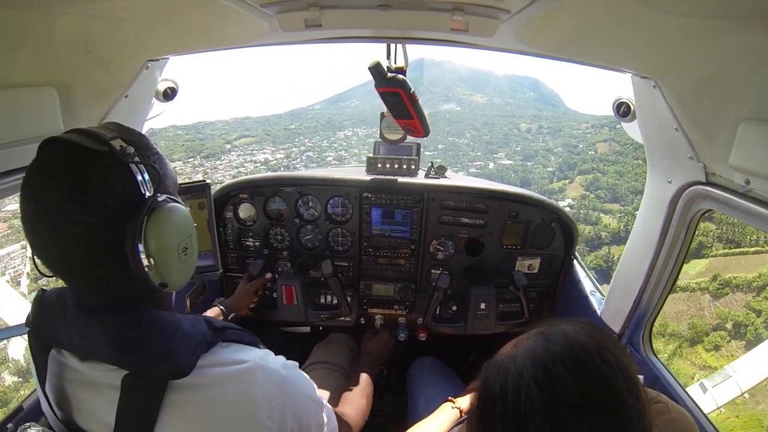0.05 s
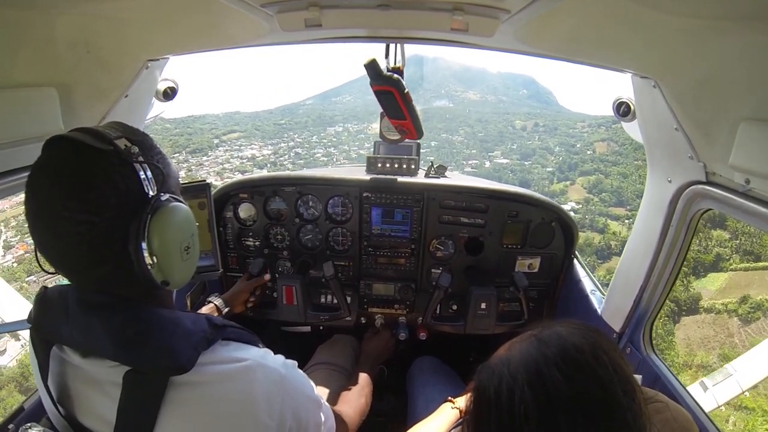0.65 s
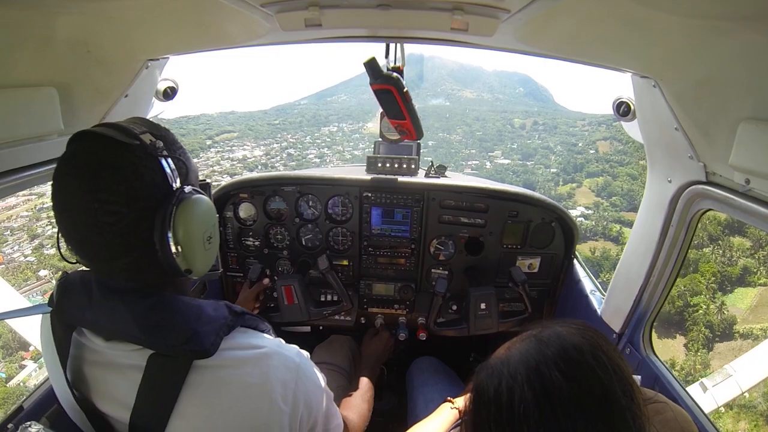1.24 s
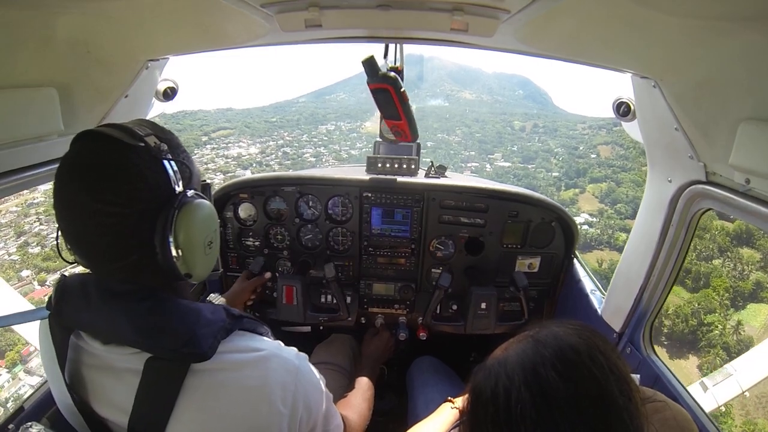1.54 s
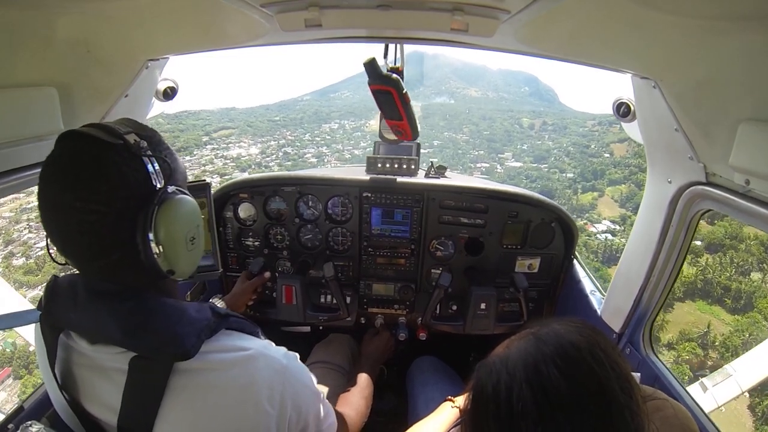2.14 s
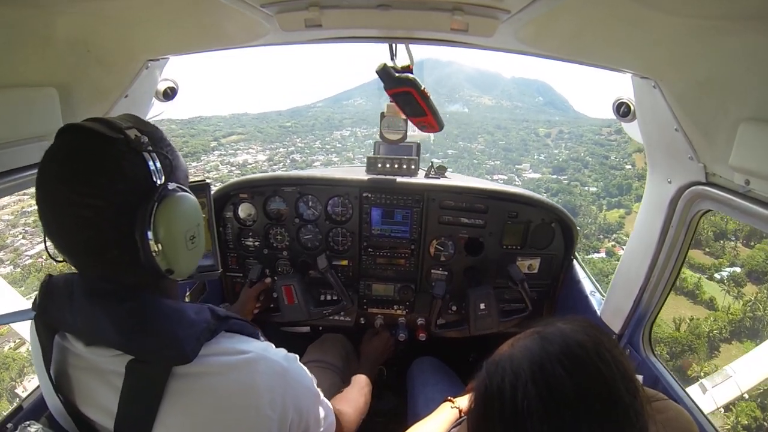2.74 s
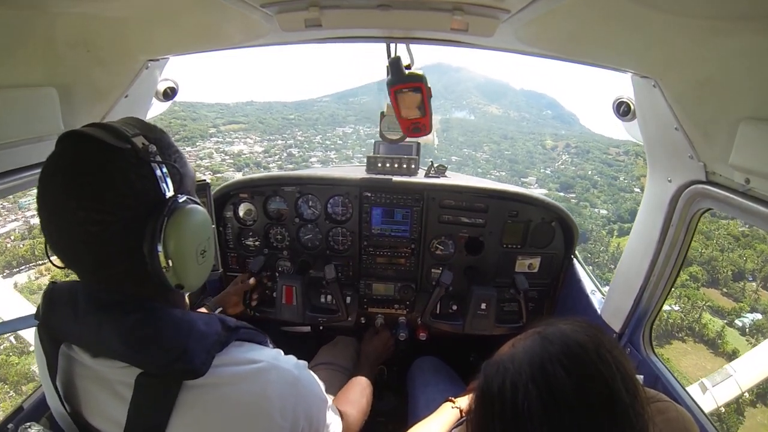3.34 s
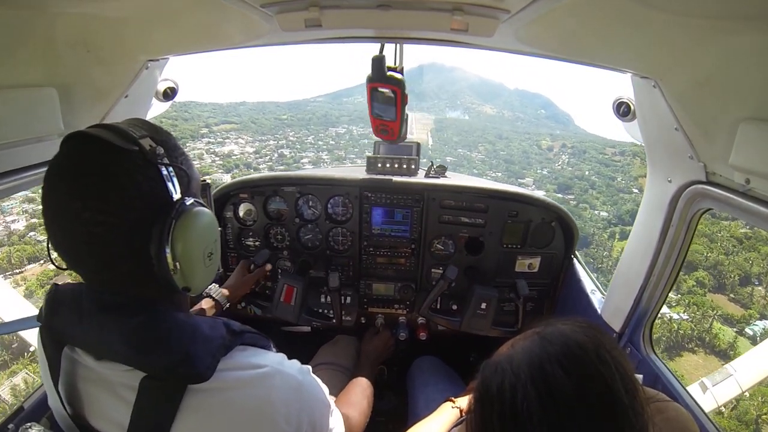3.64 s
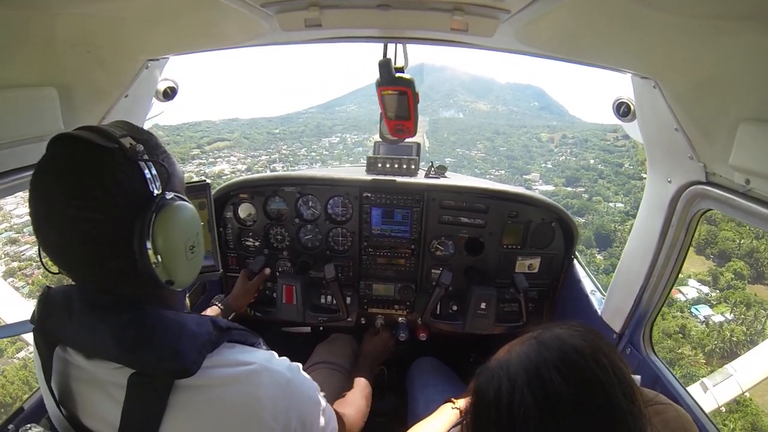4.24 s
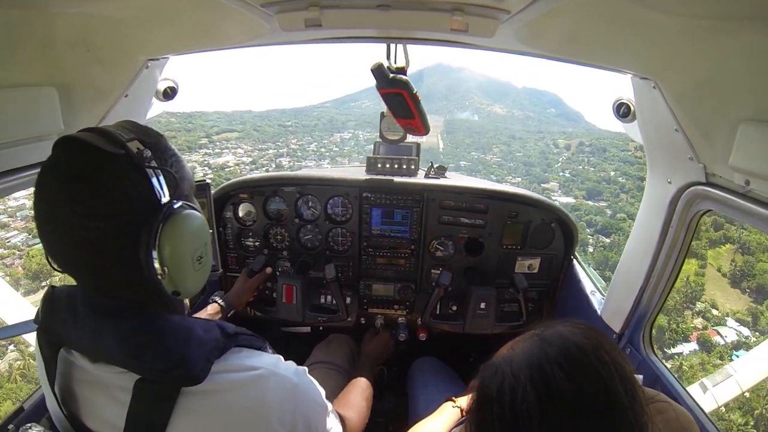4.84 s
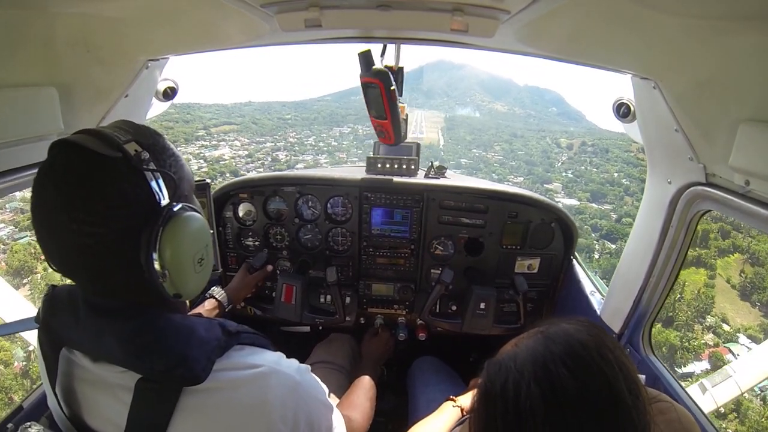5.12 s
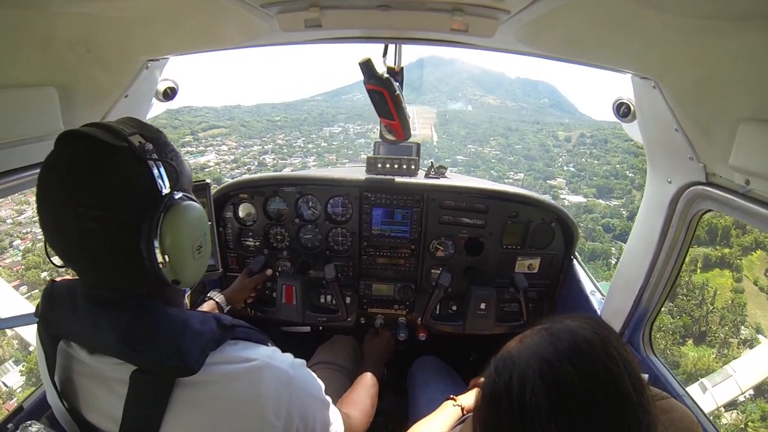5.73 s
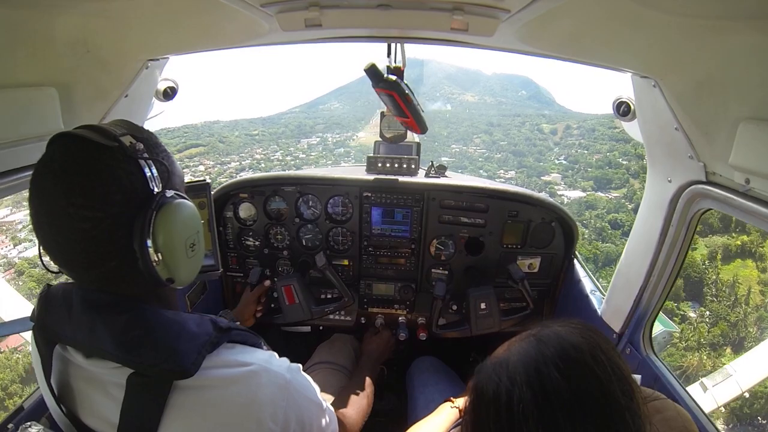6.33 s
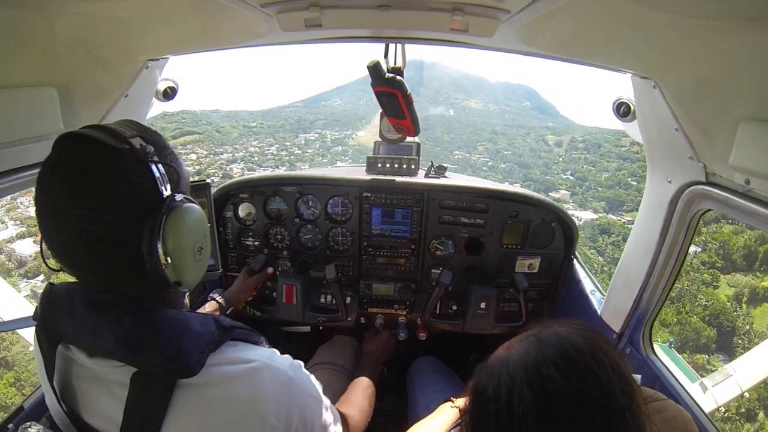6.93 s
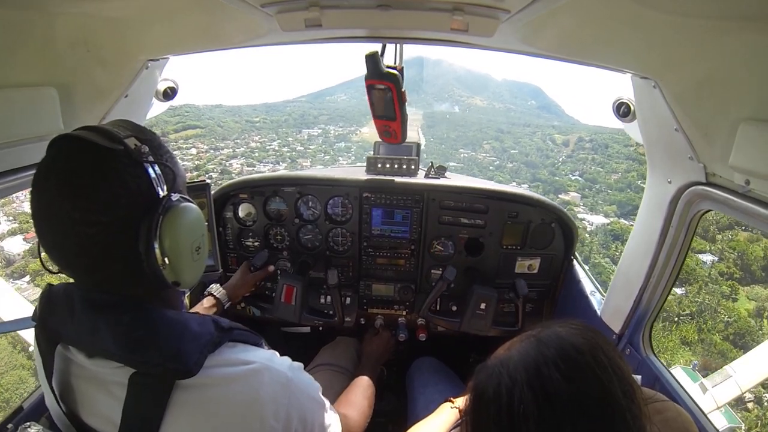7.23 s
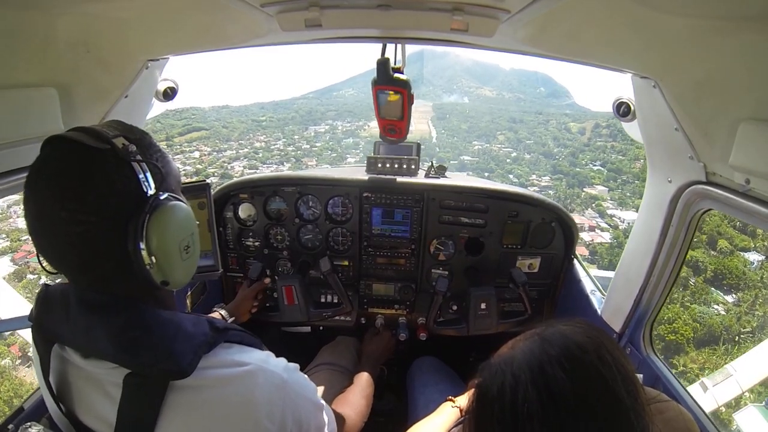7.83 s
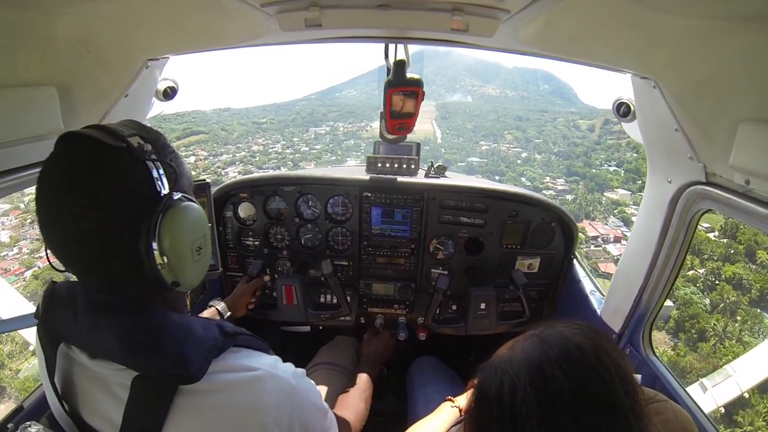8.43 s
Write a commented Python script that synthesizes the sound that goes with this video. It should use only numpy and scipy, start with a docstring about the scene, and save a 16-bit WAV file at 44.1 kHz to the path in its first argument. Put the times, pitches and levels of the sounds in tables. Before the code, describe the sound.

The deep, booming drone of a light aircraft's engine and propeller fills the cabin in flight, over airflow and light mechanical clatter.

```python
"""Light aircraft cabin in flight

A four-cylinder engine turns a two-blade propeller at about 2300 rpm. Firings and blade
passes share one deep drone; exhaust and propeller wash make the cabin boom, and the valve
gear clatters. Air rushes over the skin and whistles in the door gaps; a loose fitting clicks."""
import sys
import numpy as np
from scipy import signal
from scipy.fft import rfft, irfft, next_fast_len
from scipy.io import wavfile
from scipy.ndimage import uniform_filter1d, map_coordinates

SR = 44100
rng = np.random.default_rng(int(sys.argv[2]) if len(sys.argv) > 2 else 0)


def store_pcm(level_fs):
    """Save levels as 16-bit WAV."""
    pcm = np.round(np.clip(level_fs, -1, 1) * 32767).astype(np.int16)
    wavfile.write(sys.argv[1], SR, np.atleast_2d(pcm).T)


N = 377937


# firing-rate line: time_s, level_db
FUNDAMENTAL_DB = [(0.0, -17.5), (0.2, -13.5), (1.15, -11.5), (2.1, -12), (2.4, -15.5), (3.0, -12),
                  (3.5, -14.5), (3.7, -11.3), (4.9, -13.5), (5.25, -24.7), (5.4, -28), (5.7, -14.5),
                  (5.95, -17.5), (6.15, -10), (6.9, -13.5), (7.1, -17), (7.25, -13), (8.55, -11.5)]
# its octave: time_s, relative_db
OCTAVE_DB = [(0, -22), (.85, -28.5), (1.5, -21), (1.8, -26), (2.1, -22), (2.4, -38), (3, -24.5),
             (3.3, -31.5), (4, -27), (4.15, -23.5), (4.9, -26), (5.25, -17.5), (5.65, -35), (6.55, -17),
             (7.3, -19), (8.55, -27)]
# its third harmonic: time_s, relative_db
THIRD_DB = [(0, -19.5), (0.25, -24), (0.55, -35), (1.0, -27.5), (1.3, -33.5), (1.7, -30), (2.3, -23.1),
            (3.1, -23), (3.4, -28.5), (4.15, -23.5), (4.55, -32.1), (5.1, -30), (5.9, -24.2), (6.15, -29),
            (7.85, -30), (8.15, -20.5), (8.55, -31.5)]
# weak engine lines: firing_rate_multiple, level_db
WEAK_LINES = [(.25, -40), (.5, -38), (1.5, -30.5), (1.75, -47.5), (2.75, -32.5), (3.25, -40), (3.5, -42),
              (4, -40), (4.5, -51), (5, -53), (6, -49.5), (6.5, -56.5), (7, -51.5)]

def drone(firings):
    """Blade passes and firings: three strong lines, and weak ones from unequal cylinders."""
    phase = 2 * np.pi * firings
    lines = amp(curve(FUNDAMENTAL_DB) + .45 * wobble(18)) * np.cos(phase)
    # propeller and exhaust drift against each other, more so in the higher lines
    lines += amp(curve(OCTAVE_DB) + .23 + .68 * wobble(12)) * np.cos(2 * phase + .3 * wobble(2))
    lines += amp(curve(THIRD_DB) + 1 + .8 * wobble(7)) * np.cos(3 * phase + .4 * wobble(2))
    load_db = 1.1 * swing(WASH_STRENGTH_DB)
    for multiple, level_db in WEAK_LINES:
        drift_rad = rng.uniform(0, 2 * np.pi) + .14 * multiple * wobble(5)
        line_db = level_db + (multiple > 2) * load_db + 1.7 * wobble(6)
        lines += amp(line_db) * np.cos(multiple * phase + drift_rad)
    return np.sqrt(2) * lines


# cabin boom: time_s, relative_db
BOOM_DB = [(0, -20.0), (0.8, -19), (2.1, -21), (2.35, -16.8), (2.9, -18.8), (3.3, -14.5), (3.7, -19),
           (5.2, -17), (5.85, -12.9), (6.45, -20.5), (7.15, -16.5), (7.8, -20.5), (8.1, -19.5), (8.55, -18)]
# cabin response: freq_hz, gain_db
CABIN_SPECTRUM = [(90, -41), (122, -19.5), (146, -5.5), (175, -6), (200, -2.5), (217, 1.5), (248, -9),
                  (285, -15.5), (350, -21.5), (410, -32), (800, -59.5)]

def cabin_boom(firings):
    """Uneven exhaust puffs ring the cabin air."""
    puffs = bursts(firings, delay=.037, rise=.2, scatter_db=0, floor=.53)
    level_db = curve(BOOM_DB) - 3.4 + .83 * wobble(10)
    return amp(level_db) * steadied(coloured(puffs, CABIN_SPECTRUM), span_s=.23)


# deep buffeting: time_s, relative_db
BUFFET_DB = [(0.0, -18.4), (0.4, -15.5), (2.5, -22.5), (5.45, -14.5), (6.0, -20.2), (6.4, -15), (7.1, -23),
             (7.7, -19), (8.05, -28), (8.55, -21)]
# fuselage shake: freq_hz, gain_db
BUFFET_SPECTRUM = [(10, -37), (18, -22), (26, -24), (33, -8.5), (52, 2), (64, -6), (80, -15.5), (115, -22),
                   (160, -43.5)]

def buffet():
    """Turbulent wash shakes the fuselage."""
    level_db = curve(BUFFET_DB) - 3 + 1.8 * wobble(12)
    return amp(level_db) * steadied(coloured(noise(), BUFFET_SPECTRUM), span_s=.08)


# propeller wash: time_s, relative_db
WASH_STRENGTH_DB = [(0.0, -33.5), (1.8, -32), (2.8, -29), (3.0, -32.5), (3.85, -30), (4.35, -32.9),
                    (5.8, -25), (6.25, -31.5), (6.9, -30.1), (7.85, -35.5), (8.1, -30.5), (8.55, -32.5)]
# wash on the windscreen: freq_hz, gain_db
WASH_SPECTRUM = [(180, -14), (330, 1.5), (410, -3.5), (530, -0.5), (680, -6), (1100, -7), (2000, -20),
                 (3200, -28.5), (7500, -37.5), (10000, -43.5), (13000, -60)]

def propeller_wash():
    """The wash beats on the windscreen."""
    level_db = -35.5 + .5 * swing(WASH_STRENGTH_DB) + .6 * wobble(12)
    return amp(level_db) * coloured(noise(), WASH_SPECTRUM)


# low whistle, lower pitch first: pitch_hz, width_hz, relative_db
LOW_GAP_TONES = [(814.8, 22.8, 0), (837, 15, -1)]
# high whistle: pitch_hz, width_hz, relative_db
HIGH_GAP_TONES = [(1288, 14, -1), (1250, 32, -4)]
# faint singing above both: pitch_hz, width_hz, level_db
FAINT_TONES = [(1766, 44, -45), (1928, 48, -55.5), (2249, 45, -56.5)]
# low whistle: time_s, relative_db
LOW_GAP_DB = [(0.0, -34), (0.8, -32), (1.05, -29), (1.35, -32.5), (4.15, -32.5), (4.5, -29), (5.1, -33),
              (5.8, -26), (6.25, -29), (6.85, -32.5), (7.0, -29.5), (8.55, -33.5)]

def door_whistles(db_per_rpm=.0566):
    """Air sings in two gaps; strong wash tips the low whistle to its lower pitch."""
    upper_share = np.clip(.5 - .1 * swing(WASH_STRENGTH_DB) + .16 * wobble(3), 0, 1)
    pitch_gains = np.sqrt([1 - upper_share, upper_share])
    low = np.sum(pitch_gains * gap_tones(LOW_GAP_TONES), axis=0)
    low_db = curve(LOW_GAP_DB) - 2 + 1.3 * wobble(14)
    high = gap_tones(HIGH_GAP_TONES).sum(axis=0)
    high_db = -40.5 + db_per_rpm * swing(CRANK_RPM) + 1.2 * wobble(7)
    faint = gap_tones(FAINT_TONES).sum(axis=0)
    return amp(low_db) * low + amp(high_db) * high + faint


def gap_tones(tones, widen=1.39):
    """Air singing unsteadily in a narrow gap: one row per pitch."""
    return np.array([amp(level_db) * steadied(resonant(noise(), pitch_hz, widen * width_hz), span_s=.17)
                     for pitch_hz, width_hz, level_db in tones])


# airflow through the cabin wall: freq_hz, gain_db
RUSH_SPECTRUM = [(450, -20), (700, -5), (1000, 0), (1150, -2), (1550, 2), (1700, 1.5), (1820, -6),
                 (2020, -12), (2600, -12.5), (2900, -21.5), (5000, -27.5), (5600, -39.5), (13000, -65)]

def air_rush(db_per_rpm=.013):
    """Air over the skin; faster air spins the propeller up, so the rush grows with the revs."""
    level_db = -35.5 + db_per_rpm * swing(CRANK_RPM) + .3 * swing(CLATTER_DB) + .48 * wobble(6)
    flutter = noise() * amp(1.3 * wobble(60))
    return amp(level_db) * coloured(flutter, RUSH_SPECTRUM)


# valve clatter: time_s, relative_db
CLATTER_DB = [(0.0, -48.8), (1.4, -43), (1.6, -46.5), (1.95, -42.5), (2.3, -46), (3.5, -47.5),
              (3.65, -44.5), (4.55, -44), (5.2, -50), (5.8, -45), (5.95, -49.5), (6.2, -43), (7.15, -46.2),
              (8.55, -43.5)]
# mechanical rustle: freq_hz, gain_db
RUSTLE_SPECTRUM = [(2400, -39), (3280, -8.5), (3600, -1), (3760, -3.5), (4000, 4.5), (4500, -6),
                   (4860, -0.5), (5150, -12.5), (5700, -24), (9000, -51)]
# rocker knock: freq_hz, gain_db
ROCKER_SPECTRUM = [(1100, -13.5), (1550, 6.5), (1780, 8.5), (2000, -4.5), (2580, 1.5), (2880, -9),
                   (3080, -7.5), (3600, -29)]
# exhaust hiss: freq_hz, gain_db
HISS_SPECTRUM = [(3500, -22.5), (5300, -5), (6100, 4), (7350, -0.5), (7620, 4), (7800, 1.5), (8150, -6),
                 (8450, -10.5), (9500, -10), (11200, -17), (12300, -11.5), (13300, -22.5), (14500, -36)]

def clatter(firings):
    """Each firing brings a valve tick, a rustle, exhaust hiss and, between firings, a rocker's knock."""
    # ticks stand out more as the clatter grows
    ticks = amp(-2.6 + .35 * swing(CLATTER_DB)) * valve_ticks(firings)
    rustle = coloured(bursts(firings, delay=-.035, rise=.025, scatter_db=3.5, floor=.58), RUSTLE_SPECTRUM)
    knocks = coloured(bursts(firings, delay=.4, rise=.054, scatter_db=2, floor=.29), ROCKER_SPECTRUM)
    hiss = coloured(bursts(firings, delay=.04, rise=.15, scatter_db=3.5, floor=.39), HISS_SPECTRUM)
    level_db = curve(CLATTER_DB) - 4 + .66 * wobble(16)
    return amp(level_db) * (ticks + amp(-3) * rustle + amp(7) * knocks + amp(-12.5) * hiss)


# cylinder strengths, in firing order: relative_db
CYLINDER_DB = [-4, -5.5, -2.5, -2.5]
# valve seating, in firing order: lag_periods
VALVE_LAG_PERIODS = [.02, .04, -.02, .005]
# cylinder head modes: pitch_hz, width_hz, relative_db
HEAD_MODES = [(3633, 200, -4.5), (4040, 470, 1), (4800, 280, -5.5)]

def valve_ticks(firings, lead_periods=.04, jitter_s=.00012, scatter_db=2):
    """A valve seats once a firing, each cylinder's at its own moment, and rings the heads."""
    due = np.flatnonzero(np.diff(np.floor(firings + lead_periods)))
    count = len(due)
    force, jitter = rng.standard_normal((count, 2)).T
    lag_samples = np.resize(VALVE_LAG_PERIODS, count) * np.gradient(due) + jitter_s * SR * jitter
    seated = np.clip(due + lag_samples.astype(int), 0, N - 1)
    blows = np.zeros(N)
    blows[seated] = amp(np.resize(CYLINDER_DB, count) + scatter_db * force)
    return unit(sum(amp(db) * resonant(blows, hz, width_hz) for hz, width_hz, db in HEAD_MODES))


# loose fitting: start_s, level_db, pitch_hz, t60_s
FITTING_CLICKS = [(.6245, -44, 7500, .02), (2.8126, -51, 10900, .03), (4.509, -39, 4000, .025),
                  (6.3776, -38, 7300, .016)]

def fitting_clicks(width_hz=4000):
    """Small hard contacts of a loose fitting."""
    clicks, t = np.zeros(N), np.arange(N) / SR
    for start_s, level_db, pitch_hz, t60_s in FITTING_CLICKS:
        contact = (t >= start_s) * amp(level_db - 60 * np.abs(t - start_s) / t60_s) * noise()
        ring = resonant(contact, pitch_hz, width_hz)
        clicks += np.std(contact) * resonant(ring, pitch_hz, width_hz)
    return clicks


def bursts(firings, delay, rise, scatter_db, floor):
    """One noise burst a firing over a steady floor; delay and rise in firing periods."""
    cycle, age = np.divmod(firings - delay + 1, 1)
    cycle = np.maximum(cycle, 0).astype(int)
    peak_db = np.take(CYLINDER_DB, cycle, mode="wrap") + scatter_db * noise()[cycle]
    envelope = amp(peak_db) * age / rise * np.exp(1 - age / rise)
    return noise() * np.hypot(floor, envelope)


def amp(db):
    """Decibels to gain."""
    return 10 ** (np.asarray(db) / 20)


def unit(x):
    """Scale to rms 1."""
    return x / np.sqrt(np.mean(x ** 2) + 1e-20)


def noise():
    """White noise."""
    return rng.standard_normal(N)


def curve(rows):
    """(time_s, value) points to one value per sample."""
    return np.interp(np.arange(N) / SR, *np.transpose(rows))


def swing(rows):
    """A curve minus its mean."""
    value = curve(rows)
    return value - np.mean(value)


def wobble(rate_hz):
    """Smooth random curve with knots at rate_hz."""
    knots = rng.standard_normal(int(N * rate_hz / SR) + 4)
    return map_coordinates(knots, [np.arange(N) * rate_hz / SR])


def filtered(x, response):
    """x through a frequency response."""
    size = next_fast_len(N + SR // 2)
    return irfft(rfft(x, size) * response(np.fft.rfftfreq(size, 1 / SR)), size)[:N]


def coloured(x, spectrum):
    """x shaped by (freq_hz, gain_db) points, falling away past the ends; rms 1."""
    freq_hz, gain_db = np.transpose(spectrum)
    log_freq = np.log(np.r_[freq_hz[0] / 2, freq_hz, freq_hz[-1] * 2])
    gain_db = np.r_[-120, gain_db, -120]
    return unit(filtered(x, lambda hz: amp(np.interp(np.log(hz + 1), log_freq, gain_db))))


def resonant(x, centre_hz, width_hz):
    """x through a steep-sided resonance; rms 1."""
    def bandpass(hz):
        return 1j * hz * width_hz / (centre_hz ** 2 - hz ** 2 + 1j * hz * width_hz)
    return unit(filtered(x, lambda hz: bandpass(hz) ** 2))


def steadied(x, span_s):
    """x with swells longer than span_s evened out; rms 1."""
    power = np.abs(uniform_filter1d(x ** 2, int(span_s * SR)))
    return unit(x / np.sqrt(power + 1e-9))


# crankshaft: time_s, speed_rpm
CRANK_RPM = [(0.0, 2299), (0.55, 2305), (0.75, 2300.0), (1.45, 2327), (3.25, 2344), (4.45, 2391),
             (4.75, 2391), (5.15, 2384), (5.35, 2414), (6.3, 2305), (6.75, 2296.0), (7.35, 2310),
             (8.0, 2302.0), (8.55, 2342)]

def scene():
    """Engine and airflow in mono; the engine fires twice a crankshaft turn."""
    firings = np.cumsum(2 * curve(CRANK_RPM) / 60) / SR
    engine = drone(firings) + cabin_boom(firings)
    airflow = buffet() + propeller_wash() + door_whistles() + air_rush()
    return (engine + airflow + clatter(firings) + fitting_clicks())[None]


def record(dry, ceiling=.85, fade_s=.002, top_hz=14800):
    """Soft peak limit, end fades, steep low-pass."""
    limited = dry / (1 + np.abs(dry / ceiling) ** 8) ** (1 / 8)
    edge_samples = np.minimum(np.arange(N), np.arange(N)[::-1])
    fade = np.minimum(1, edge_samples / (fade_s * SR))
    return signal.sosfilt(signal.butter(14, top_hz, fs=SR, output="sos"), limited * fade)


dry = scene()
out = record(dry)
store_pcm(out)
```